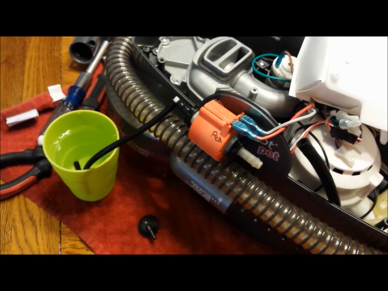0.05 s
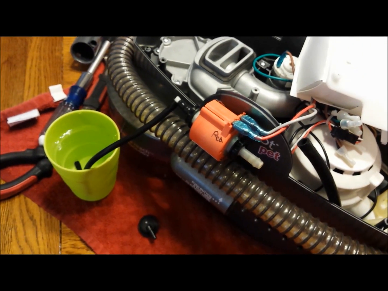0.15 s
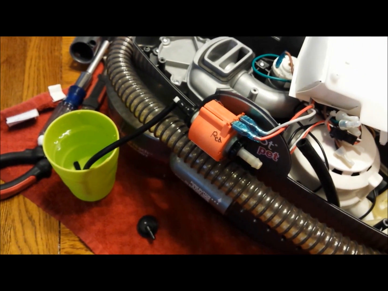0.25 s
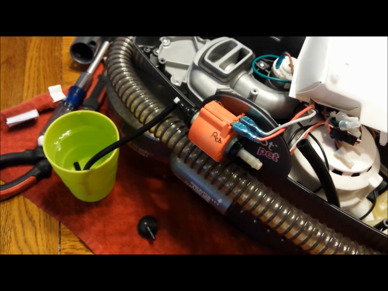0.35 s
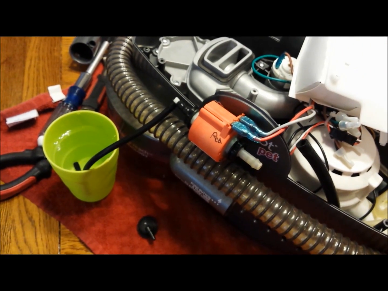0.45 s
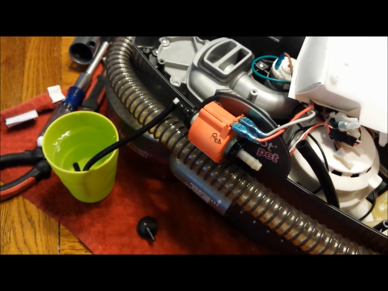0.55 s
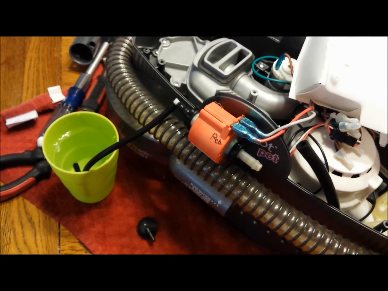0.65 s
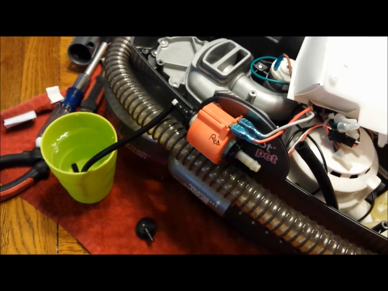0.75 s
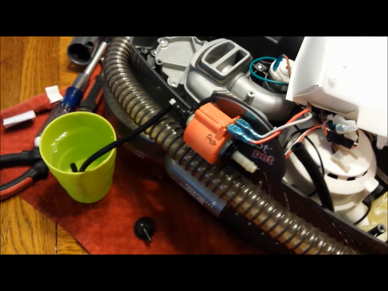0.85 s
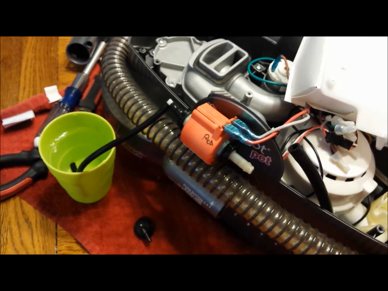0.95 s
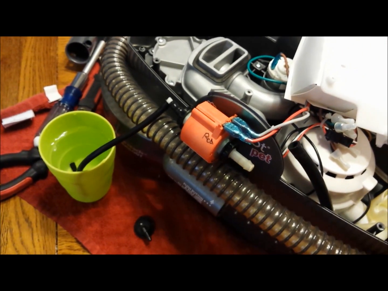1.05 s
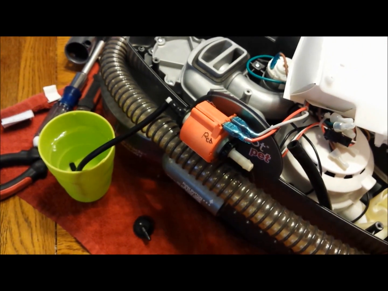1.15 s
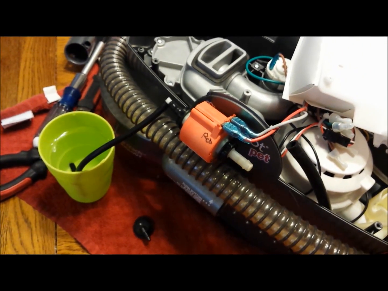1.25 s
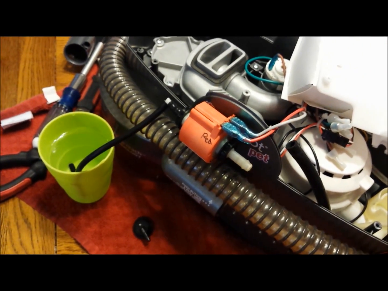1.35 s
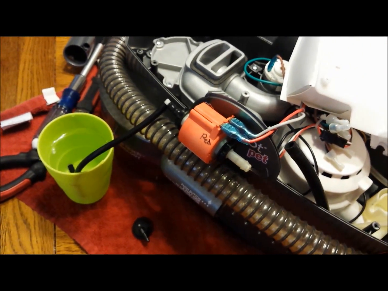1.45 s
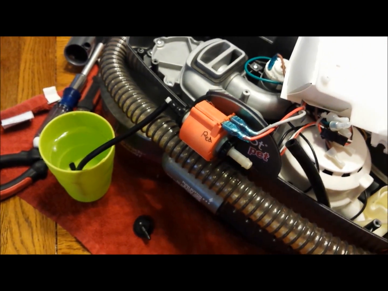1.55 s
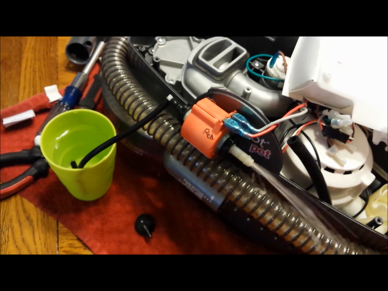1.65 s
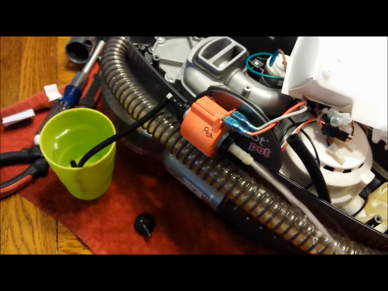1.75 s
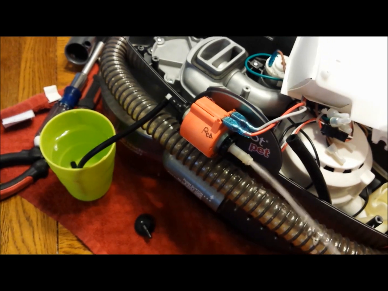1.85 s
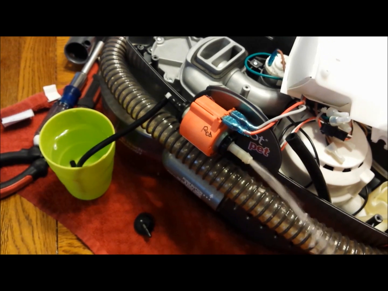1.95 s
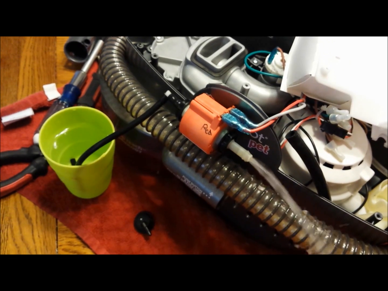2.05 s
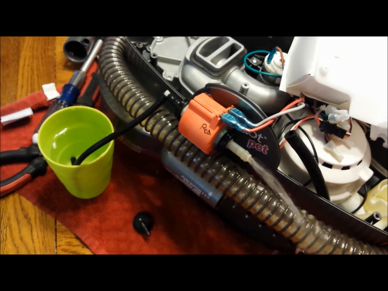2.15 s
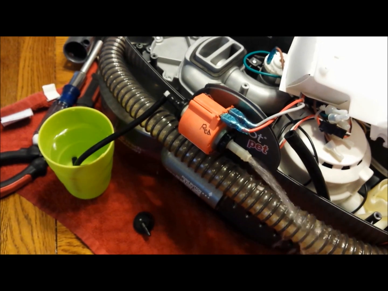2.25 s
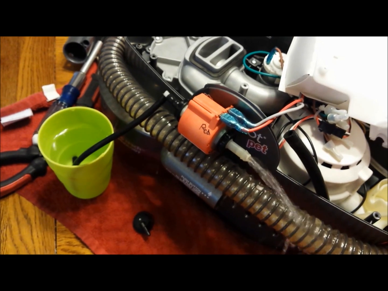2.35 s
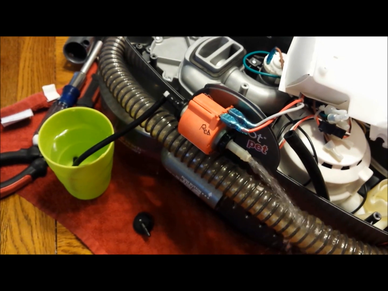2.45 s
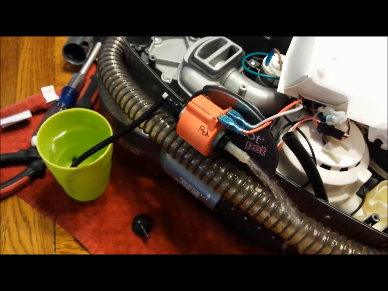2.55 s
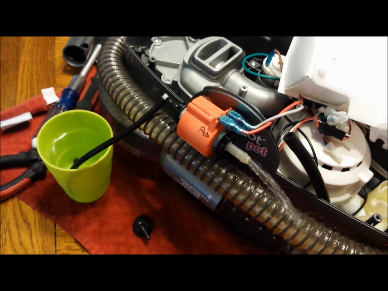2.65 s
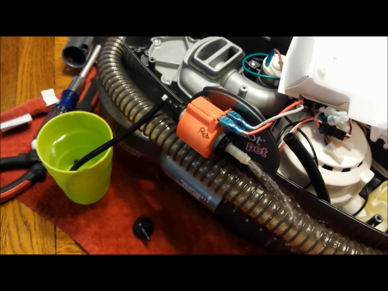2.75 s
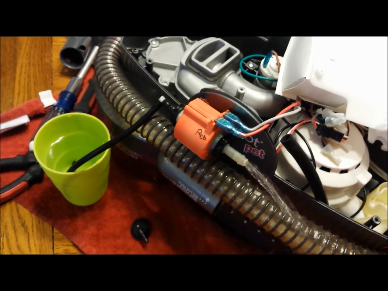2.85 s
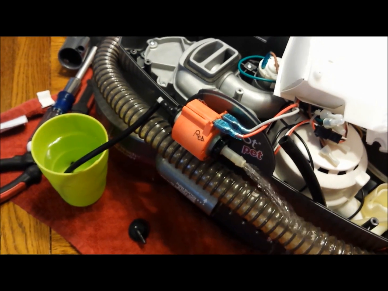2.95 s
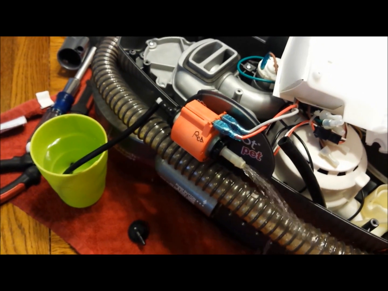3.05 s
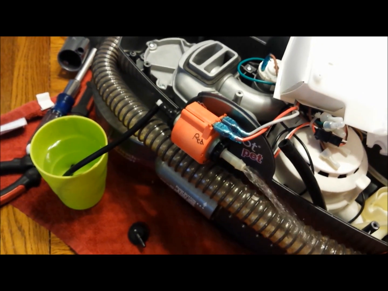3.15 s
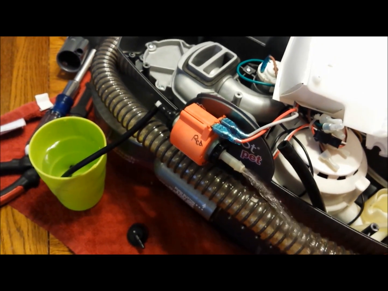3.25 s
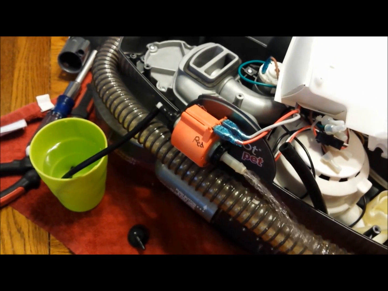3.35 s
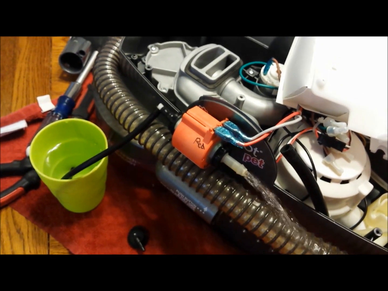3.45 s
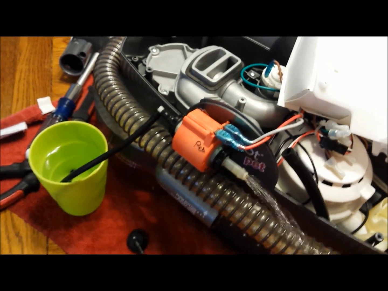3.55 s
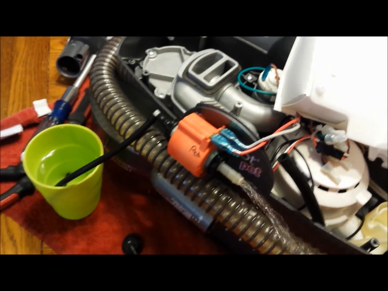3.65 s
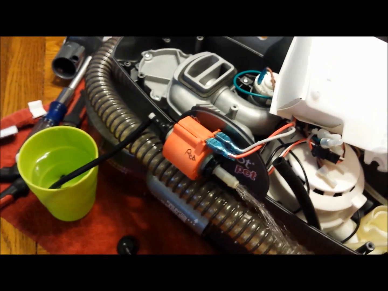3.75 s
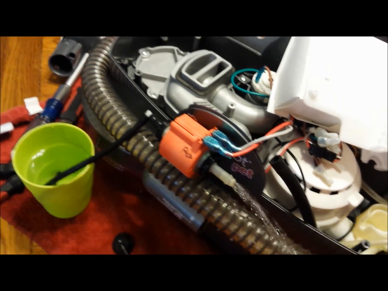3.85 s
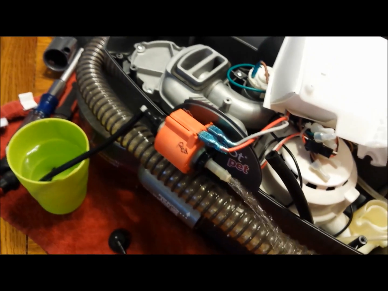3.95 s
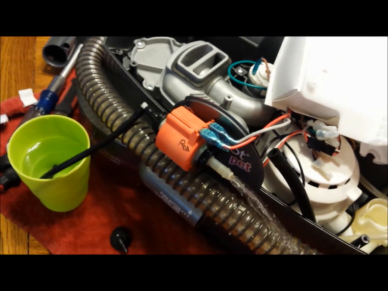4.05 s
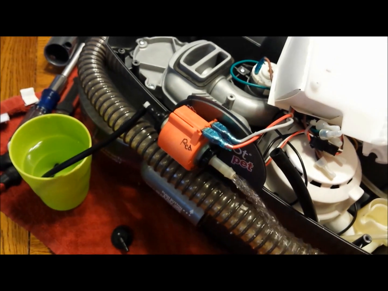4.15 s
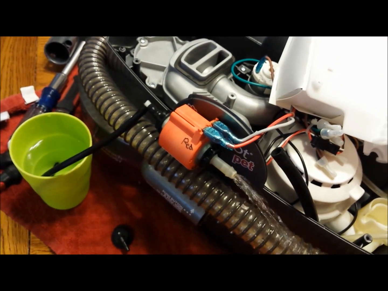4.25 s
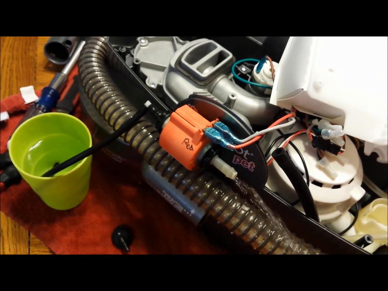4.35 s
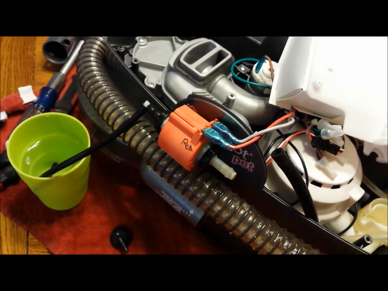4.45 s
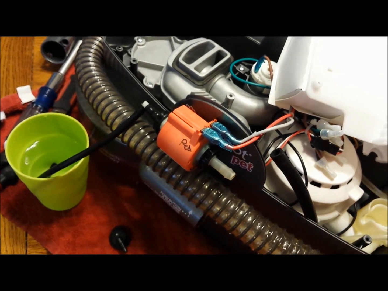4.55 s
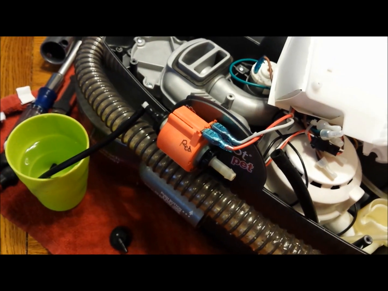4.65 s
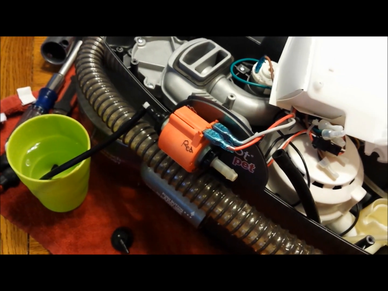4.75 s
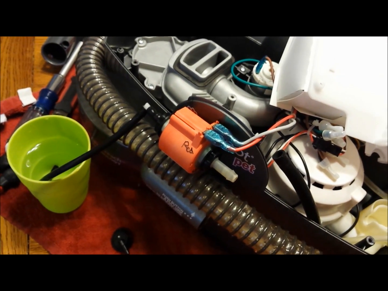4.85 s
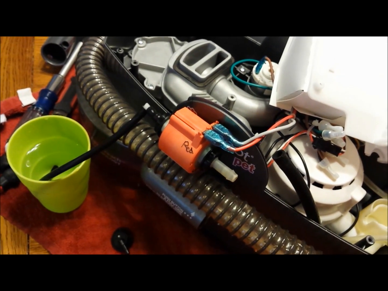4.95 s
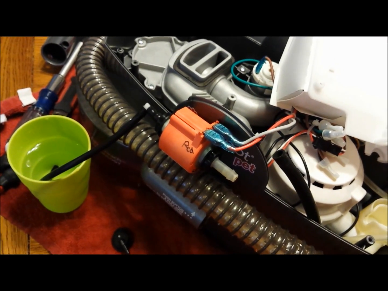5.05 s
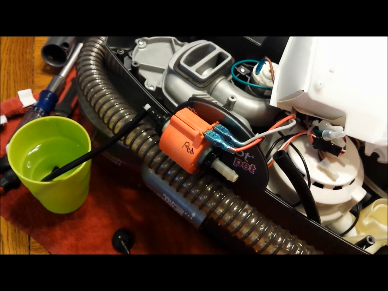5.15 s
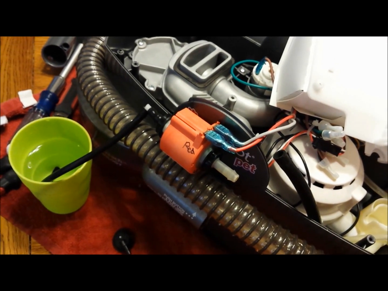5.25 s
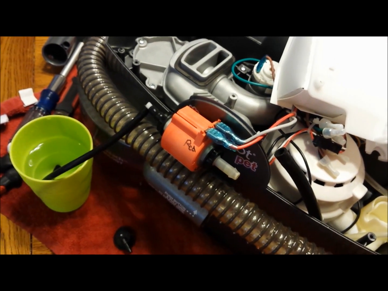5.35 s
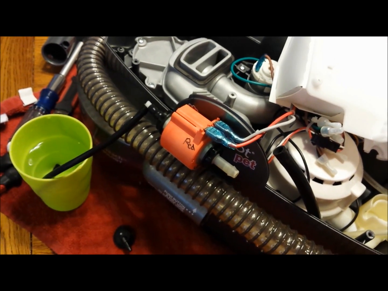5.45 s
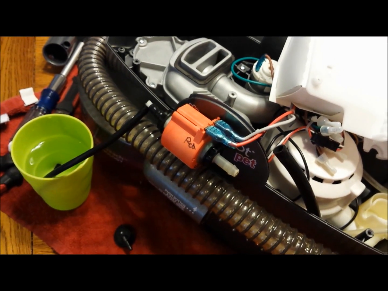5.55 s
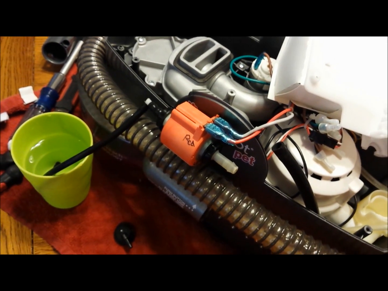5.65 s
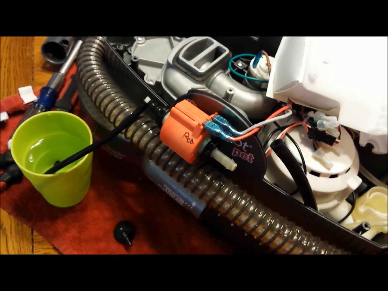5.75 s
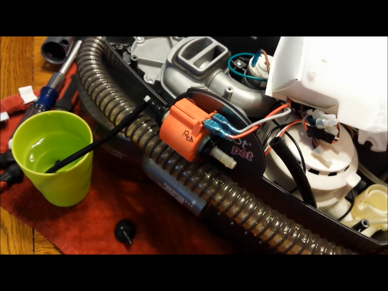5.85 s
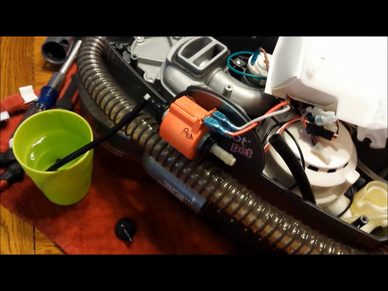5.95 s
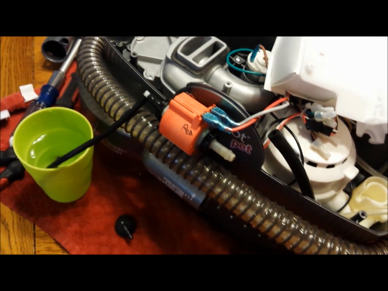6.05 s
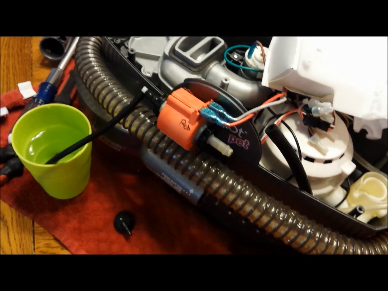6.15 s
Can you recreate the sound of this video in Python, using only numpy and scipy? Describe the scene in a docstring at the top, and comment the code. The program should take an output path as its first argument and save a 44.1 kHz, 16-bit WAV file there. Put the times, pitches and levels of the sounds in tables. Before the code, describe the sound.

A quiet room with a few faint knocks, then an opened-up cleaning machine starts abruptly. Its pump clatters hard and dry at a fast buzzing rate while the suction motor sweeps up to a thin high whine over roaring, hissing air. The rattle softens as water arrives. After a few steady seconds power is cut and the whine glides down. Close stereo microphones indoors.

```python
"""A quiet room with a few faint knocks; then a small opened-up cleaning machine on the floor is switched on.
Its mains-driven piston pump rattles dry (bursts of noise) and softens once water fills it.
Its suction motor spins up to a thin whine (sines locked to the shaft, swelling at resonances) over
rushing air (coloured, flickering noise), and coasts down after switch-off. Two microphones stand close by."""
import sys
import numpy as np
from scipy import signal
from scipy.fft import rfft, irfft, next_fast_len
from scipy.io import wavfile
from scipy.ndimage import uniform_filter1d

SR = 44100
rng = np.random.default_rng(int(sys.argv[2]) if len(sys.argv) > 2 else 0)


def wav_record(signal):
    """Record a signal, one row per channel, as 16-bit PCM in the file named by sys.argv[1]."""
    frames = np.transpose(np.atleast_2d(signal))
    bounded = np.clip(frames, -1, 1)
    # unit amplitude maps onto the largest positive 16-bit level
    quanta = np.round(bounded * 32767).astype(np.int16)
    wavfile.write(sys.argv[1], SR, quanta)


N = 273420  # length in samples
SWITCH_ON_S, SWITCH_OFF_S = 0.97, 4.541
FULL_SPEED_HZ = 427.5  # shaft turns per second


def undb(db):
    """Amplitude factor of a level in dB."""
    return 10 ** (np.asarray(db) / 20)


def unit(x):
    """Scale to an rms of 1."""
    return x / np.sqrt(np.mean(x ** 2))


def curves(table):
    """Straight lines over time through each column after the first, which holds seconds."""
    s, *columns = np.transpose(table)
    return [np.interp(np.arange(N) / SR, s, c) for c in columns]


def walk(rate):
    """Random levels held 1 / rate s and smoothed twice over that time; spread below 1."""
    k = int(SR / rate)
    steps = np.repeat(rng.standard_normal(N // k + 1), k)
    return uniform_filter1d(uniform_filter1d(steps, k), k)[:N]


def band(x, hz, width):
    """Two-pole resonance, gain 1 at the centre."""
    return signal.lfilter(*signal.iirpeak(hz, hz / width, fs=SR), x)


def above(x, hz):
    """The part above hz, in phase with x so that it can be added or taken away."""
    return signal.sosfiltfilt(signal.butter(3, hz, "high", fs=SR, output="sos"), x)


def even(x, seconds):
    """Noise with its loudness evened out, so that a blow rings at its own strength."""
    return x / np.sqrt(uniform_filter1d(x ** 2, int(seconds * SR)) + 1e-9)


def coloured(colour, flicker_db=0., rate=8.):
    """Stereo noise of a colour; with flicker_db, each half octave flickers on its own."""
    size = next_fast_len(N)
    octave = np.log2(np.maximum(np.fft.rfftfreq(size, 1 / SR), 1))
    hz, *columns = np.transpose(colour)
    left_db, right_db, alike = (np.interp(octave, np.log2(hz), c) for c in columns)
    alike = np.clip(alike, -1, 1)
    # the balance of sum and difference sets the left-right likeness
    mid, side = rfft(rng.standard_normal((2, size))) * np.sqrt([1 + alike, 1 - alike])
    pair = np.array([mid + side, mid - side]) * undb([left_db, right_db])
    if not flicker_db:
        return unit(irfft(pair, size)[:, :N])
    out, halves = 0, 2 * octave
    for centre in range(int(2 * np.log2(hz[0])), int(2 * np.log2(hz[-1])) + 2):
        share = np.clip(1 - abs(halves - centre), 0, 1)
        out = out + irfft(pair * share, size)[:, :N] * undb(flicker_db * walk(rate))
    return unit(out)


def bursts(times, peak_db, pan_db, rise_s, decay_s):
    """Stereo envelope: a short rise and an exponential fall at each time; positive pan is left."""
    kicks = np.zeros((2, N))
    pair_db = peak_db + np.array([pan_db, -pan_db]) / 2
    np.add.at(kicks, (slice(None), (times * SR).astype(int)), undb(pair_db))
    t = np.arange(SR // 40) / SR
    shape = np.minimum(t / rise_s, np.exp((rise_s - t) / decay_s))
    return signal.fftconvolve(kicks, shape[None])[:, :N]


def shaft_hz():
    """Speed climbs towards full after switch-on; after switch-off air drag and friction slow the rotor."""
    # The speed still to gain dies away in three stages. Each row: share, time constant in seconds.
    spin_up = [(.419, .074), (.5195, .2647), (.0615, .696)]
    spin_start_s = .978
    # coasting loses air_drag * speed^2 + friction, in Hz per s
    air_drag, friction_hz_per_s = .00144, 40.44
    t = np.arange(N) / SR
    powered = np.clip(t - spin_start_s, 0, SWITCH_OFF_S - spin_start_s)
    hz = FULL_SPEED_HZ * (1 - sum(share * np.exp(-powered / s) for share, s in spin_up))
    balance = np.sqrt(friction_hz_per_s / air_drag)  # the speed at which drag equals friction
    coasting_s = np.maximum(t - SWITCH_OFF_S, 0)
    return balance * np.tan(np.arctan(hz / balance) - air_drag * balance * coasting_s)


def whine():
    """Clean tones locked to the shaft; the broken multiple is the ball bearing, the rest slots, bars and blades."""
    # Motor tones. Each row: multiple of shaft speed, lead of left over right at full speed in radians,
    # level off resonance at full speed in dB.
    orders = [(1, 0., -44), (4.42, .3, -70), (7, -1.8, -48), (8, .5, -70), (12, -3., -48), (13, 0., -55),
              (18, 1., -60), (24, 3., -52), (27, .5, -70), (36, .5, -60)]
    # Resonances of casing or floor that swell a tone sweeping through. Each row: multiple, centre in Hz,
    # width in Hz (11 dB down at its edges), left level in dB, right level in dB, -1 where right is inverted.
    swells = [(1, 414, 40, -40, -41), (4.42, 810, 150, -28, -34), (4.42, 1010, 110, -36, -38),
              (7, 2130, 220, -36, -42), (7, 2750, 300, -32, -38), (7, 2880, 130, -34, -30),
              (7, 2995, 20, -36, -48), (8, 1420, 200, -43, -34), (8, 1600, 150, -46, -42),
              (12, 760, 500, -28, -28), (12, 1350, 350, -30, -25), (12, 2090, 150, -36, -40),
              (12, 2220, 140, -28, -39), (12, 2310, 120, -34, -32), (12, 2400, 120, -29, -36),
              (12, 2580, 140, -43, -41), (12, 2780, 150, -55, -41), (12, 3745, 150, -34, -36),
              (12, 3950, 250, -35, -33), (12, 4230, 220, -46, -35), (12, 4500, 200, -34, -44),
              (12, 4720, 250, -34, -35), (12, 5090, 360, -20, -22.5), (13, 5300, 400, -42, -46),
              (13, 5560, 30, -31, -36), (18, 7670, 200, -46, -32), (24, 4700, 300, -39, -48, -1),
              (24, 4950, 350, -39, -37, -1), (24, 5450, 260, -31, -42), (24, 6200, 700, -38, -44),
              (24, 6900, 600, -42, -28), (24, 7750, 300, -50, -30), (24, 9000, 400, -50, -33),
              (24, 10200, 400, -50, -32), (27, 5350, 300, -35, -48), (36, 7500, 700, -47, -33),
              (36, 6500, 400, -48, -39)]
    # Ringing of the stator, shaken by the starting current. Each row: multiple, centre in Hz, width in Hz,
    # left and right levels under full starting current in dB, polarity at the right.
    stator = [(12, 2350, 150, -27, -45, -1), (12, 2520, 200, -31, -25, -1), (12, 2700, 200, -23, -23, -1),
              (12, 3050, 250, -38, -28, -1), (12, 3620, 200, -28, -33, 1), (12, 3900, 250, -30, -37, 1),
              (12, 4400, 300, -25, -40, 1), (12, 4700, 250, -30, -22, 1), (24, 6700, 900, -22, -24, 1)]
    # Swells under power only. Each row: multiple, centre in Hz, width in Hz, left level in dB, right level in dB.
    powered = [(12, 4920, 80, -24, -29), (12, 5090, 360, -17, -32)]
    # Swells of the coasting rotor only. Each row: multiple, centre in Hz, width in Hz, left and right in dB.
    coasting = [(7, 1220, 130, -40, -31), (7, 1480, 150, -50, -37), (7, 1700, 200, -41, -47),
                (7, 1920, 250, -46, -37), (12, 3330, 180, -34, -37), (12, 3660, 110, -50, -35),
                (12, 3765, 110, -33, -45), (12, 3850, 100, -37, -37), (12, 4070, 110, -35, -42),
                (12, 4640, 260, -26, -44), (12, 4830, 160, -29, -32)]
    start_current_s, field_fade_s = .3, .05  # time constants: starting current, magnetic part after switch-off
    strain_rad = 1.3  # scale of the phase wobble under full starting current
    in_phase_below, apart_over = .55, .32  # shares of full speed

    t, speed = np.arange(N) / SR, shaft_hz()
    turns = np.cumsum(speed) / SR
    current = np.exp(-np.maximum(t - SWITCH_ON_S, 0) / start_current_s)
    # slow tones reach both microphones in phase, faster ones drift apart
    apart = np.clip((speed / FULL_SPEED_HZ - in_phase_below) / apart_over, 0, 1)
    coarse = slice(0, N, 64)  # swells change slowly
    field = np.exp(-np.maximum(t[coarse] - SWITCH_OFF_S, 0) / field_fade_s)

    def swell(table, order):
        """Stereo gain of the resonances that the tone is sweeping through."""
        total = 0
        for multiple, hz, width, left_db, right_db, *sign in table:
            if abs(multiple / order - 1) < .03:
                polarity = np.array([[1], sign or [1]])
                detuning = 2 * (order * speed[coarse] - hz) / width
                total = total + undb([[left_db], [right_db]]) * polarity / (1 + detuning ** 2) ** 1.9
        return total

    out = 0
    for order, lead, off_db in orders:
        gain = undb(off_db) * speed[coarse] / FULL_SPEED_HZ + np.zeros((2, 1))
        gain = gain + swell(swells, order) + current[coarse] * swell(stator, order)
        gain = gain + field * swell(powered, order) + (1 - field) * swell(coasting, order)
        if order % 1:
            gain = gain * (t[coarse] > SWITCH_OFF_S)  # the bearing sings only when the rotor runs free
        gain = np.array([np.interp(t, t[coarse], g) for g in gain])
        phase = 2 * np.pi * (order * turns + rng.random()) + np.array([[lead], [0]]) * apart
        phase = phase + strain_rad * np.sqrt(current) * walk(70)
        # quick flutter; broken up while the motor strains, patchy while it coasts
        waver_db = 1.3 * walk(30) + 2.4 * walk(150)
        waver_db = waver_db + 2.5 * np.sqrt(current) * walk(50)
        waver_db = waver_db + 1.4 * (t > SWITCH_OFF_S) * walk(14)
        out = out + np.sqrt(2) * gain * undb(waver_db) * np.sin(phase)
    return out


def air():
    """Turbulence: low roar that rings the duct's pipe modes, rush through the casing, hiss off blades and brushes."""
    # Level of the air as it is heard: it sinks after switch-off and comes back up in part late in the
    # run-down, while the rotor still slows. Each row: time in seconds, level in dB.
    heard_level = [(0.975, -8.5), (1.05, -10), (1.12, -3.5), (1.3, -1.5), (1.6, -1.5), (1.85, 1), (2.3, 0),
                   (4.5, -0.5), (4.75, 0.5), (5.05, -1.5), (5.35, -4), (5.5, -4), (5.9, -1.5), (6.19, -3)]
    # Colours of the three layers at the two microphones.
    # Each row: frequency in Hz, left level in dB, right level in dB, left-right likeness from -1 to 1.
    roar_colour = [(30, -33, -42, .8), (60.4, -35, -23.5, 0.97), (112, -13.5, -17, 1),
                   (175, -8, -6.5, 0.97), (210, 1.5, 0.5, 1), (334, 0.5, 0, 0.96), (490, 0.5, -4, 0.98),
                   (685, 3.5, -1, 0.36), (855, -1.5, -7.5, 0.29), (950, -10.5, 1, 0.99),
                   (1170, -18, -9.5, 0.51), (1425, -23, -1.5, 0.58), (2220, -25, -28, .2)]
    rush_colour = [(750, -12, -13.5, 0.34), (1280, -0.5, -2, 0.63), (1630, -4, -3.5, 0.022),
                   (1735, 4, -1, 0.094), (2410, 2.5, -2.5, 0.58), (2620, 2.5, 1.5, 0.056),
                   (3140, -1, 3, 0.072), (3050, -0.5, -1, 0), (3900, 0.5, 2, 0.0042),
                   (4550, 2, -13, 0.0066), (4600, -15, 3, 0.049), (6500, -35, -22, 0)]
    hiss_colour = [(3200, -23, -25, 0.23), (4820, -5, -5, -0.26), (5100, 0.5, -4.5, -0.083),
                   (6030, -1, -9.5, 0.17), (6800, -8, 2.5, -0.21), (7280, -1.5, -1, -0.14),
                   (7960, -34, 2.5, 0.21), (8030, -8.5, -4.5, 0.05), (9180, -18.5, -11, 0.056),
                   (9830, -19, -17, 0.18), (10600, -29, -14.5, 0.048), (11600, -24, -19, -0.033),
                   (13000, -24.5, -18, -0.13), (15000, -30, -36, 0)]
    # Pipe modes of the duct. Each row: centre in Hz, width in Hz, boost in dB.
    duct_modes = [(135.3, 14, 9), (237.6, 7.4, 4), (455, 17, 1), (564.4, 22, 4.5), (689, 12, 4),
                  (839, 26, 6), (1039, 45, 9)]
    roar_mix_db, rush_mix_db, hiss_mix_db = -25, -22, -16.5  # balance at full speed, ahead of the heard level
    rush_law, hiss_law = 0.35, 0.79  # dB that rush and hiss lose against the roar per dB of speed lost
    sparks_db, sparks_s = 7, .35  # brushes sizzle under the starting current
    jet_s, jet_db, jet_width_s = 1.82, 2.5, 0.096  # the treble swells as the first water spits out
    hum_s, hum_hz, hum_db, hum_width_s = 4.77, 694, 7.5, 0.12  # a hum swells briefly early in the run-down

    t = np.arange(N) / SR
    level_db = curves(heard_level)[0]
    slow_db = np.maximum(20 * np.log10(shaft_hz() / FULL_SPEED_HZ + 1e-9), -8)  # speed lost, at most 8 dB
    coast_db = slow_db * (t > SWITCH_OFF_S)
    sizzle_db = sparks_db * np.exp(-np.maximum(t - SWITCH_ON_S, 0) / sparks_s)
    sizzle_db = sizzle_db + jet_db * np.exp(-((t - jet_s) / jet_width_s) ** 2)
    swell_db = hum_db * np.exp(-((t - hum_s) / hum_width_s) ** 2)

    roar = coloured(roar_colour, flicker_db=1.25, rate=2.65)
    roar = roar + sum((undb(db) - 1) * band(roar, hz, width) for hz, width, db in duct_modes)
    rush = coloured(rush_colour, flicker_db=1.5, rate=16.)
    hiss = coloured(hiss_colour, flicker_db=1.0, rate=12.)
    hiss = hiss + (undb(sizzle_db) - 1) * above(hiss, 9700.0)
    # the hiss around the whine grows with speed
    hiss = hiss + (undb(.5 * slow_db) - 1) * (hiss - above(hiss, 4600.0))
    # a coasting rotor sheds its eddies lower: the upper rush falls away and the rumble grows
    rush = rush + (undb(coast_db) - 1) * above(rush, 3500.0)
    rumble = roar - above(roar, 400.0) + band(roar, 146.0, 30.) + band(roar, 500.0, 120.)
    roar = roar + (undb(-.4 * coast_db) - 1) * rumble
    roar = roar + (undb(swell_db) - 1) * band(roar, hum_hz, 50.)

    mix = undb(roar_mix_db) * unit(roar)
    mix = mix + undb(rush_mix_db + rush_law * slow_db) * rush
    mix = mix + undb(hiss_mix_db + hiss_law * slow_db) * hiss
    return undb(level_db) * mix


def pump():
    """One piston stroke per mains cycle: hard blows and chatter while dry, softer uneven strokes until power is cut."""
    # The hardest blows of the dry pump. Each row: time in seconds, peak in dB, peak of its bright tick in dB,
    # dB by which its dull knock stands out.
    dry_blows = [(0.9684, -27, -60, 11), (0.9757, -11, -22, 0), (0.9782, -18, -38, 1),
                 (0.9856, -19, -22, 7), (1.0005, -16, -18, 7), (1.0183, -7, -19, 1), (1.0328, -18, -26, 5),
                 (1.0346, -16, -25, 4), (1.051, -8, -20, 1), (1.068, -11, -24, 2), (1.083, -21, -24, 6),
                 (1.0848, -22, -29, 6), (1.1011, -8, -18, 0), (1.1179, -11, -18, -3), (1.1348, -12, -24, 1),
                 (1.1504, -15, -21, 0), (1.1677, -7, -17, -2), (1.1844, -16, -29, 2), (1.2002, -12, -24, 7),
                 (1.2166, -10, -23, 1), (1.2335, -14, -23, 4), (1.2502, -12, -27, 1), (1.3009, -9, -24, -3),
                 (1.3503, -12, -27, 0), (1.3664, -11, -24, 0), (1.4334, -12, -31, 0), (1.501, -11, -26, 0),
                 (1.6347, -11, -25, 0), (1.7174, -12, -30, 0)]
    # Colour of a blow. Each row: frequency in Hz, left level in dB, right level in dB, left-right likeness.
    blow_colour = [(300, -33, -28, 0.51), (1500, -14, -26, 0.56), (3470, -16, -15, 0.17),
                   (5560, -11, -9.5, 0.2), (6500, 8, 4, 0), (7960, -19, 0.5, 0), (8900, -16, -6, 0),
                   (11900, -19, -5.5, 0.31), (15000, -11, -10, 0.18)]
    # The steady strokes, before their unevenness. Each row: time in seconds, peak in dB, peak of their ticks in dB.
    wet_path = [(1.22, -22, -21), (1.42, -7, -25), (1.46, -23, -33), (1.52, -11, -23), (1.75, -16, -24),
                (2.0, -26, -35), (4.5, -33, -40)]
    # The loose piston chattering between blows, before its scatter. Each row: time in seconds, peak in dB.
    chatter_path = [(0.98, -35), (1.02, -26), (1.075, -21), (1.11, -34), (1.16, -36), (1.25, -41)]
    mains_hz, rattles = 60, 140
    rise_s, ring_s = .0017, .0014  # rise and decay of a blow
    tick_rise_s, tick_ring_s = .001, .0012

    s, db, tick_db, knock_db = np.transpose(dry_blows)
    strokes = np.arange(s[-1] % (1 / mains_hz), SWITCH_OFF_S, 1 / mains_hz)
    # a hard blow takes the place of the stroke next to it
    strokes = strokes[abs(strokes[:, None] - s).min(axis=1) > .25 / mains_hz]
    wet_s, *wet_db = np.transpose(wet_path)
    uneven_db = 1.8 * rng.standard_normal(len(strokes))
    soft_db, soft_tick_db = (np.interp(strokes, wet_s, c, left=-200) + uneven_db for c in wet_db)
    chatter = rng.uniform(chatter_path[0][0], chatter_path[-1][0], rattles)
    chatter_db = np.interp(chatter, *np.transpose(chatter_path)) + 2.0 * rng.standard_normal(rattles)
    # left-right balance in dB: all lean to the right
    pan, stroke_pan, chatter_pan = -1.5 + 0 * s, -2 + 0 * strokes, -2.5 + 0 * chatter

    ring = coloured(blow_colour)
    tick = above(ring, 10800.0)
    blows = bursts(s, db, pan, rise_s, ring_s)
    body = blows + bursts(strokes, soft_db, stroke_pan, 0.00077, 0.00055)
    body = body + bursts(chatter, chatter_db, chatter_pan, 0.00051, 0.0011)
    ticks = bursts(s, tick_db, pan, tick_rise_s, tick_ring_s)
    ticks = ticks + bursts(strokes, soft_tick_db, stroke_pan, 0.0007, 0.0017)
    ticks = ticks + bursts(chatter, chatter_db - 7, chatter_pan, .0004, 0.00088)
    knocks = bursts(s, db + knock_db, pan, rise_s, ring_s) - blows
    clack = even(ring - tick, 0.0017)
    dull = clack - above(clack, 5300)
    return body * clack + knocks * dull + ticks * even(tick, .0015)


def room():
    """Quiet room and the microphones' own hiss, with a few soft knocks; only the part below 1200 Hz wavers."""
    # Colour of the stillness. Each row: frequency in Hz, left level in dB, right level in dB, left-right likeness.
    still_colour = [(30, -16, -16, .8), (100, -7, -6, .95), (160, -8, -9, 0.87), (211, 1.5, 1.5, 0.89),
                    (400, -10, -13, .8), (560, -8, -16, 0.12), (850, -22, -18, 0.27),
                    (1500, -23, -24, 0.19), (2960, -25.5, -25, 0), (5500, -24, -24, 0), (7600, -22, -13, 0),
                    (9000, -26, -20.5, 0), (15000, -30, -32, 0)]
    # Faint knocks nearby. Each row: start in seconds, peak in dB, pitch in Hz.
    faint_knocks = [(0.039, -55, 371), (0.059, -54, 339), (0.176, -61, 700), (0.363, -63, 840),
                    (0.383, -60, 519)]
    still_db = -63
    still = coloured(still_colour)
    low = still - above(still, 1200.)
    out = undb(still_db) * (still + (undb(1.1 * walk(11.6)) - 1) * low)
    for s, db, hz in faint_knocks:
        t = np.maximum(np.arange(N) / SR - s, 0)
        thud = band(band(rng.standard_normal(N), hz, 400.), hz, 400.)
        out = out + undb(db) * np.minimum(t / 0.0027, 1) * np.exp(-t / 0.01) * even(thud, 0.022)
    return out


def scene():
    """Air and whine fade in within 9.1 ms of switch-on; pump and room are added."""
    running = np.clip((np.arange(N) / SR - SWITCH_ON_S) / 0.0091, 0, 1)
    return running * (air() + whine()) + pump() + room()


def record(dry):
    """The microphone input clips near full scale, then a steep low-pass cuts the top."""
    top_hz = 15350
    low_pass = signal.ellip(12, .2, 100, top_hz, fs=SR, output="sos")
    return signal.sosfilt(low_pass, np.clip(dry, -.9, .9))


dry = scene()
out = record(dry)
wav_record(out)
```